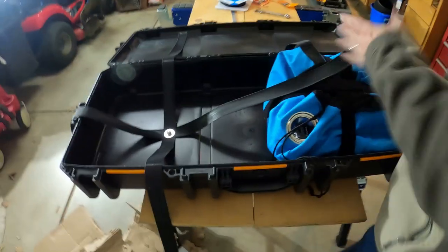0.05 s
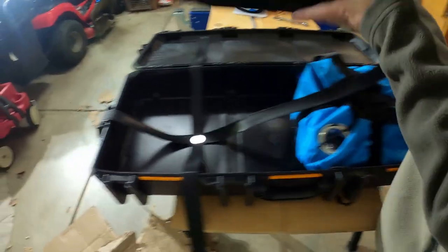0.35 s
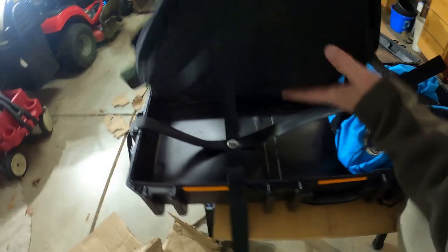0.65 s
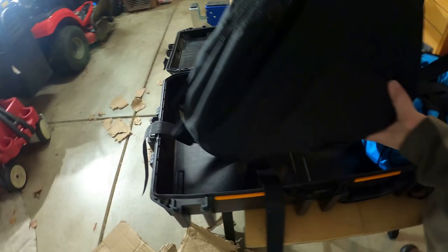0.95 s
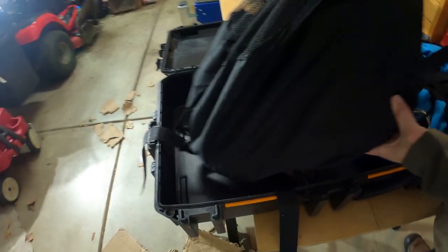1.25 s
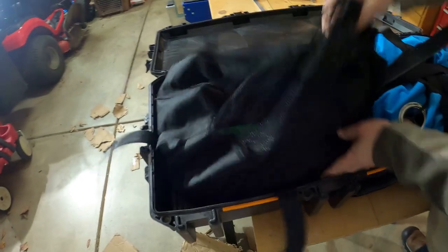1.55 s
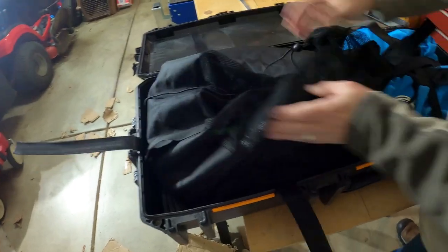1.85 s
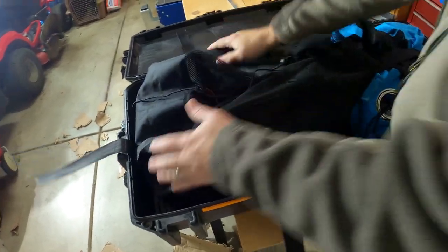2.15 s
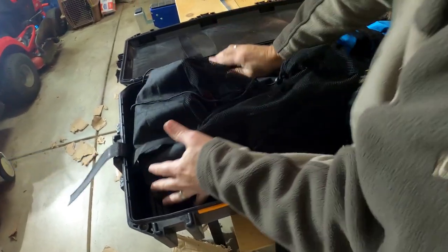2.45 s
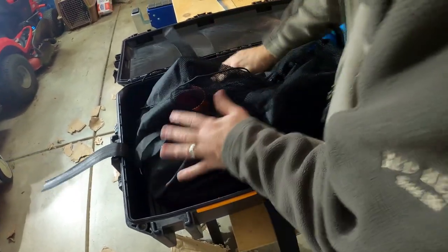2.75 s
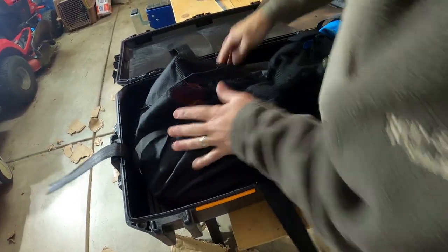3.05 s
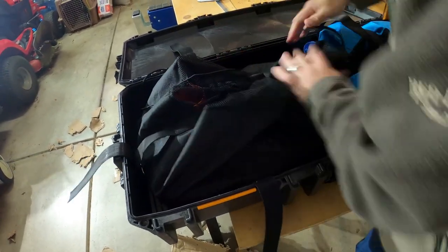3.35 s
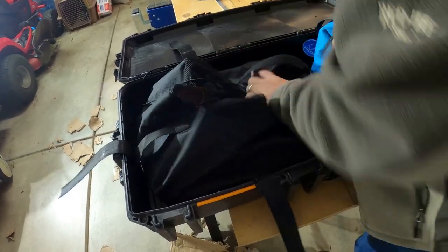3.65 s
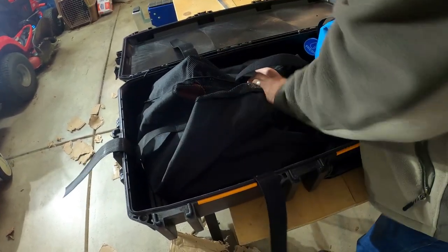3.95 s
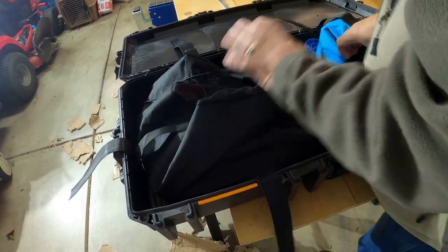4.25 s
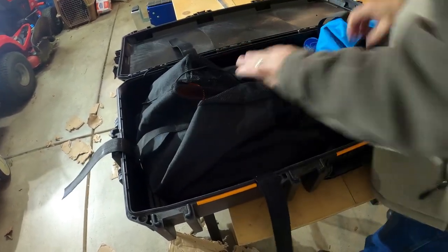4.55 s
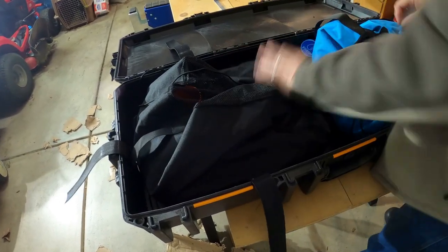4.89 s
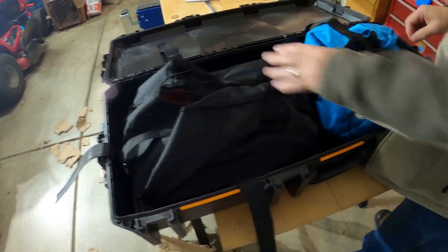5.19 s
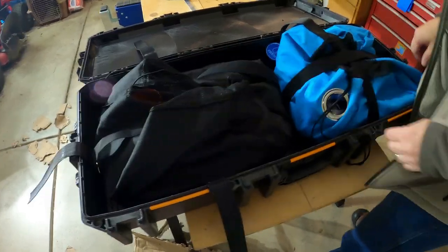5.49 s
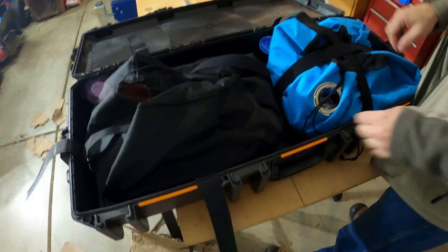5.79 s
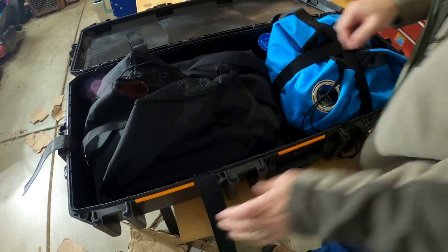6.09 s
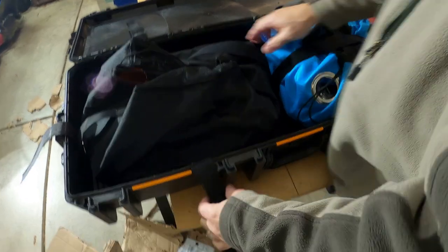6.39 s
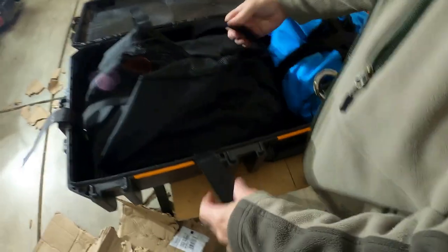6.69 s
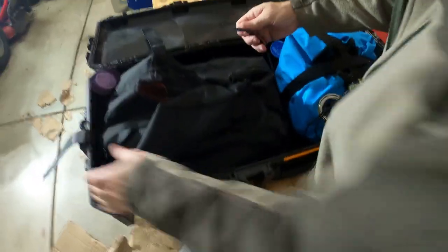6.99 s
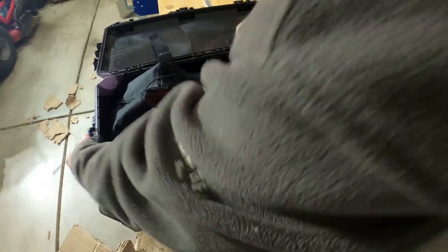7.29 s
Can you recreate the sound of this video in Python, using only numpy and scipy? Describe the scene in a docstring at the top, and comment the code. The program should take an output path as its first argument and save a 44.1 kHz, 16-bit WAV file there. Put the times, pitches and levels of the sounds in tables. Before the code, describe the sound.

Close swishing of nylon being packed into a plastic case, with padded hollow thuds and small buckle clicks in a garage.

```python
"""Packing nylon bags into a plastic case

Soft bags are lifted, dropped and patted down into a hard case, close by in a garage.
Cloth slides, crinkles and judders on the plastic, buckles tap it, and the padded blows
boom in the shell. At the end a strap is pulled up over the rim."""
import sys
import numpy as np
from scipy import signal
from scipy.fft import rfft, irfft, next_fast_len
from scipy.io import wavfile
from scipy.ndimage import uniform_filter1d, map_coordinates

SR = 44100
rng = np.random.default_rng(int(sys.argv[2]) if len(sys.argv) > 2 else 0)


def store_wav(level_fs):
    """Save 16-bit WAV to argv[1]."""
    pcm = np.round(np.clip(np.atleast_2d(level_fs), -1, 1) * 32767)
    wavfile.write(sys.argv[1], SR, pcm.T.astype(np.int16))


N = 323253


def amp(db):
    """Decibels to gain."""
    return 10 ** (np.asarray(db) / 20)


def unit(x):
    """Scale to rms 1."""
    return x / np.sqrt(np.mean(x ** 2) + 1e-20)


def along(points, hz):
    """Interpolate (Hz, value) points on a log frequency axis."""
    knots_hz, values = np.transpose(points)
    return np.interp(np.log(hz + 1), np.log(knots_hz + 1), values)


def fade(t, t60):
    """Exponential decay by 60 dB in t60."""
    return np.exp(-np.log(1000) * t / t60)


def wobble(rate_hz):
    """Smooth random curve, rate_hz knots a second."""
    knots = rng.standard_normal(int(N * rate_hz / SR) + 4)
    return map_coordinates(knots, [np.arange(N) * rate_hz / SR])


def filtered(x, response):
    """Apply a gain given as a function of frequency."""
    size = next_fast_len(x.shape[-1] + SR // 2)
    return irfft(rfft(x, size) * response(np.fft.rfftfreq(size, 1 / SR)), size)[..., :x.shape[-1]]


def coloured(x, spectrum):
    """Shape x by (Hz, dB) points, at rms 1."""
    return unit(filtered(x, lambda hz: amp(along(spectrum, hz))))


def band(x, low_hz, high_hz, order):
    """Causal band-pass."""
    sos = signal.butter(order, [low_hz, min(high_hz, 0.45 * SR)], 'band', fs=SR, output='sos')
    return signal.sosfilt(sos, x)


def add(track, start_s, sound):
    """Mix a sound into a track."""
    start = max(round(start_s * SR), 0)
    track[start:start + len(sound)] += sound[:N - start]


# Garage reverberation. Each row: frequency in Hz, t60 in seconds.
GARAGE_DECAY = [(100, 0.25), (300, 0.63), (1000, 0.33), (4000, 0.44), (12000, .22)]


def garage(x, wet_db):
    """Add the room's tail, drawn anew each call as it differs from place to place."""
    hz, t, noise = signal.stft(rng.standard_normal(SR // 2), SR, nperseg=256)
    envelope = fade(t, along(GARAGE_DECAY, hz)[:, None]) * (1 - np.exp(-t / 0.0051))
    tail = signal.istft(noise * envelope, SR, nperseg=256)[1]
    return x + amp(wet_db) * signal.fftconvolve(x, tail / np.linalg.norm(tail))[:len(x)]


# Panel modes of the open case. Each row: frequency in Hz, level in dB, t60 in seconds.
SHELL_MODES = [(123.4, 2.5, 0.23), (143.3, 2.5, 0.38), (170, -22, 0.29), (230, 5.5, 0.2), (255, -10, .25),
               (325, -5, 0.71), (378, 6, 0.14), (480, -28, .25), (500, -1, 0.19), (517, 4, 0.28),
               (570, 1, 0.21), (646, -10, 0.14), (950, -2, .2)]


def shell(x, ring_db):
    """Add the ringing of the case panels that x drives."""
    t = np.arange(SR // 2) / SR
    ring = sum(amp(db) * np.cos(2 * np.pi * hz * t) * fade(t, t60_s) for hz, db, t60_s in SHELL_MODES)
    return x + amp(ring_db) * signal.fftconvolve(x, ring / np.abs(rfft(ring)).max())[:len(x)]


# Background noise. Each row: frequency in Hz, density in dB.
AIR_SPECTRUM = [(15, -62), (25, -32), (95, -31), (158, 7.5), (925, -15), (1150, 1.5), (1240, -3),
                (1900, -5), (2420, -26), (6340, -16.5), (8290, -30), (10500, -35), (14900, -67)]


def air():
    """Faint, steady room noise."""
    return amp(-56) * coloured(rng.standard_normal(N), AIR_SPECTRUM)


def friction(spectrum, rate_hz, spread_db, grain_db):
    """Sliding weave: a smooth rush plus tiny slips of uneven size."""
    slips = (rng.random(N) < rate_hz / SR) * rng.choice([-1, 1], N)
    sizes = amp(spread_db * np.clip(rng.standard_normal(N), -2, 2))
    return coloured(rng.standard_normal(N) + amp(grain_db) * unit(slips * sizes), spectrum)


def folds(x, depth_db=1.9):
    """Folds open and close, shifting the colour of the rub."""
    frames = signal.stft(x, nperseg=512)[2]
    drift = uniform_filter1d(rng.standard_normal(frames.shape), size=16, axis=0)
    drift = uniform_filter1d(drift, size=6, axis=1)
    return signal.istft(frames * amp(depth_db * unit(drift)), nperseg=512)[1][:N]


def crinkles(rate_hz, centre_hz, spread_db):
    """Creases pop at random, each a few cycles at its own pitch."""
    out, t = np.zeros(N), np.arange(SR // 80) / SR
    for when, pitch, size in rng.random((int(rate_hz * N / SR), 3)):
        hz = centre_hz * 2 ** (3 * pitch - 1.5)
        pop = np.sin(2 * np.pi * hz * t) * fade(t * hz, 8)
        add(out, when * N / SR, amp(spread_db * size ** 2) * pop)
    return unit(out)


# Hands lift, press, tuck and pull. Each row: start in seconds, length in seconds, effort in dB,
# slick nylon and shell drag in dB over the effort.
HAND_MOVES = [(0.0, 1, -43, -15, -4.5), (0.502, 0.039, -38.5, 5, -4.5), (0.575, 0.24, -43, -0.5, -3),
              (0.878, .06, -40.5, -3.5, -6), (1.003, .12, -44.5, -8.5, -5.5),
              (1.185, 0.059, -41.5, -13.5, -7), (1.33, 0.46, -40.5, -7.5, -11),
              (1.632, 0.094, -32.5, -16.5, 6.5), (2.19, 0.59, -40, -8, -1.5), (2.556, 0.2, -32.5, -15, 1.5),
              (2.853, 0.11, -40, -13.5, 5), (3.054, 0.056, -36.5, -15, -2.5), (3.448, 0.15, -39, -9.5, 1.5),
              (3.66, 0.12, -35, -17, 2), (3.822, 0.16, -42.5, -13.5, 9), (4.062, 0.2, -39.5, -15, -2.5),
              (4.32, 0.29, -48, -10.5, 5), (4.515, 0.1, -34, -20, 5), (4.723, 0.18, -46, -16.5, 0),
              (5.026, 0.1, -41.5, -7, -7), (5.2, 0.13, -50.5, -15.5, 2.5), (5.626, 0.41, -55.5, -9.5, -1),
              (6.142, 0.24, -45, -15, -9), (6.667, 0.066, -38.5, -6, -3), (6.785, 0.47, -48, -5.5, 0.5)]
# Sleeves never quite rest. One row: rub, scrape, hiss and drag floors in dB.
SLEEVE_FLOOR_DB = [-54, -60, -68, -60]


def efforts_db(attack_s=0.086, release_s=0.11, arch_db=2):
    """Rub, scrape, hiss and drag levels: each move swells, is fastest midway and dies away."""
    t = np.arange(N) / SR
    power = np.outer(amp(SLEEVE_FLOOR_DB) ** 2, np.ones(N))
    for start_s, length_s, db, slick_db, drag_db in HAND_MOVES:
        before = np.maximum((start_s - t) / attack_s, 0)
        after = np.maximum((t - start_s - length_s) / release_s, 0)
        drop_db = 20 * (before + after)
        arch = (2 * np.clip((t - start_s) / length_s, 0, 1) - 1) ** 2
        near = drop_db < 80
        envelope = amp(db - drop_db[near] - arch_db * arch[near])
        scrape_db = 0.37 * slick_db - 2
        power[:, near] += np.outer(amp([0, scrape_db, slick_db, drag_db]), envelope) ** 2
    return 10 * np.log10(power)


# Cloth rub, coarse weave, slick nylon, drag on the shell. Each row: frequency in Hz, density in dB.
RUB_SPECTRUM = [(100, -20), (300, -4.5), (600, 4.5), (1000, 1), (1900, -1.5), (2600, -6), (4500, -30),
                (8000, -62)]
SCRAPE_SPECTRUM = [(600, -41), (1500, -1.5), (2300, 2), (3300, -1), (4600, -3.5), (5500, -14.5),
                   (8000, -27.5), (14000, -46)]
HISS_SPECTRUM = [(500, -44.5), (2000, 4), (4400, 4), (6500, 2.5), (8800, -2.5), (10000, 0.5), (11700, -5),
                 (13000, -7), (15000, -46)]
DRAG_SPECTRUM = [(25, -42), (80, -46), (125, -7.5), (220, 2.5), (380, 4), (520, -1), (750, -27),
                 (1300, -14.5), (4000, -72)]


def handling():
    """Bags and sleeves slide and crinkle; under load the drag drums on the shell."""
    rub_db, scrape_db, hiss_db, drag_db = efforts_db()
    # A light stroke glides, a firm one catches and lets go.
    grip_db = wobble(38) * np.interp(rub_db, [-50, -42], [0.7, 1.9])
    rub = amp(rub_db - 1.5) * folds(friction(RUB_SPECTRUM, rate_hz=540, spread_db=9, grain_db=-10.5))
    weave = folds(friction(SCRAPE_SPECTRUM, rate_hz=600, spread_db=3.5, grain_db=-2))
    scrape = amp(scrape_db - 0.04 + 0.55 * wobble(24)) * weave
    creases = amp(scrape_db - 9) * crinkles(rate_hz=130, centre_hz=2800, spread_db=18)
    hiss_gain = amp(hiss_db - 0.5 + 1.05 * wobble(42))
    hiss = hiss_gain * folds(friction(HISS_SPECTRUM, rate_hz=890, spread_db=7.5, grain_db=-5))
    drag = unit(shell(friction(DRAG_SPECTRUM, rate_hz=90, spread_db=7, grain_db=0), ring_db=1))
    cloth = garage(amp(grip_db) * (rub + scrape + creases + hiss), wet_db=-16.5)
    return cloth + amp(drag_db - 0.2 + 2.46 * wobble(30)) * drag


# Fast cloth strokes. Each row: peak time in seconds, level in dB, 20 dB rise and fall in seconds,
# brightness in Hz.
CLOTH_STROKES = [(0.296, -38.5, 0.058, 0.046, 1800), (.472, -33.5, 0.016, 0.11, 12000),
                 (1.49, -34, 0.13, 0.087, 3000), (2.0, -45.5, 0.045, 0.16, 2000),
                 (2.732, -34, 0.012, .08, 2570), (3.124, -36.5, 0.073, .015, 1700),
                 (3.224, -37, 0.017, 0.098, 6700), (4.115, -40.5, 0.18, 0.017, 2160),
                 (4.466, -33.5, .07, 0.023, 5000), (6.738, -32, 0.1, 0.1, 2750),
                 (7.015, -40.5, 0.014, 0.076, 9000)]
# Their colour. Each row: frequency in Hz, density in dB.
STROKE_SPECTRUM = [(60, -15), (200, -1), (500, -2.5), (1000, -2), (2000, -3.5), (4000, -2.5), (5500, -6),
                   (8500, -10.5), (11000, -9), (15000, -28)]


def swishes():
    """A stroke, free or part of a blow, swells until the cloth stops; faster ones are brighter."""
    out, t = np.zeros(N), np.arange(N) / SR
    weave = folds(friction(STROKE_SPECTRUM, rate_hz=1500, spread_db=5, grain_db=-1))
    free_strokes = [(0, *row) for row in CLOTH_STROKES]
    for start_s, peak_s, db, rise_s, fall_s, bright_hz in [*free_strokes, *blow_strokes()]:
        stroke = unit(band(weave, 77, bright_hz, order=1)) * (t >= start_s)
        drop_db = 20 * np.maximum((peak_s - t) / rise_s, (t - peak_s) / fall_s)
        out += amp(db - drop_db) * stroke
    return garage(out, wet_db=-12)


# The bag judders on the shell. Each row: start in seconds, level in dB, pitch in Hz,
# length in seconds, roughness from 0 to 1.
BAG_JUDDERS = [(2.564, -13, 482, 0.026, 0.38), (3.743, -25.5, 516, 0.036, 0.42),
               (4.13, -24, 522, 0.035, 0.29), (4.768, -37, 536.5, 0.14, 0.99),
               (5.245, -41, 560, 0.11, 0.84), (6.588, -32, 410, 0.018, 0.43), (6.665, -32, 600, 0.043, 0.6),
               (6.705, -28, 670, 0.016, 0.67)]


def judders():
    """Nylon sticks and slips on plastic: even slips hoot, uneven ones rub hoarsely."""
    out, t = np.zeros(N), np.arange(SR // 4) / SR
    for start_s, db, hz, length_s, rough in BAG_JUDDERS:
        slip_hz = hz * (1 - 0.14 * np.exp(-t / 0.005) + 0.25 * rough * wobble(350)[:len(t)])
        hoot = np.sin(2 * np.pi * np.cumsum(slip_hz) / SR)
        envelope = np.exp(-(t / length_s) ** 2) * (1 - np.exp(-t / 0.0014))
        flutter_db = 2.6 * rough * wobble(117)[:len(t)]
        add(out, start_s, amp(db + flutter_db) * envelope * hoot)
    return garage(out, wet_db=-11)


# Buckles and strap ends hit plastic. Each row: start in seconds, level in dB, brightness in Hz,
# decay scale in seconds.
BUCKLE_TAPS = [(.0428, -13, 3450, 0.036), (.3006, -16.5, 2630, 0.059), (.3746, -21.5, 2230, 0.058),
               (.406, -23, 2430, .039), (.4376, -14, 3540, 0.056), (.4444, -17.5, 1970, 0.054),
               (.5194, -17.5, 1090, 0.3), (.54, -30.5, 6140, 0.035), (.625, -22.5, 2000, 0.038),
               (.8592, -12, 2020, 0.047), (.861, -17, 940, .04), (1.234, -30, 1780, .057),
               (1.9912, -34, 1800, 0.048), (2.2727, -25.5, 4230, 0.021), (2.6262, -13.5, 4330, 0.012),
               (2.8853, -15.5, 3600, .014), (2.8925, -11.5, 1090, .026), (3.138, -18.5, 980, 0.022),
               (3.5795, -19.5, 1300, .025), (3.6146, -17.5, 1310, 0.022), (3.6594, -16, 1250, 0.036),
               (4.285, -33, 8060, .022), (4.592, -20.5, 1490, 0.13), (4.904, -35.5, 6960, 0.014),
               (5.006, -12, 3540, .03), (5.109, -28.5, 1820, 0.049), (5.1502, -22.5, 2380, 0.015),
               (6.594, -26.5, 1940, 0.12), (6.636, -27, 4570, 0.02)]
# Rim and buckle modes. Each row: frequency in Hz, level in dB, t60 in seconds.
PLASTIC_MODES = [(890, -6, .09), (1157, -6, .08), (1588, -1, .09), (1640, -1, .08), (1797, -2, .09),
                 (2030, 2, .09), (2355, -4, .07), (2770, -2, .05), (3500, -4, .04), (3625, -4, .04),
                 (4416, -6, .03)]
# A hard contact. Each row: frequency in Hz, density in dB.
CRACK_SPECTRUM = [(300, 14), (4500, 2), (5600, -3.5), (14000, -16)]


def taps():
    """Buckles and blows crack on the plastic and ring it; harder contacts reach higher modes."""
    out, t = np.zeros(N), np.arange(SR // 2) / SR
    for start_s, db, bright_hz, decay_s in [*BUCKLE_TAPS, *blow_contacts()]:
        ring = np.zeros(len(t))
        for hz, mode_db, t60_s in PLASTIC_MODES:
            gain = amp(mode_db + rng.normal(0, 0.25))
            ring += gain * np.sin(2 * np.pi * (hz * t + rng.random())) * fade(t, t60_s)
        ring *= amp(-14.5) * fade(t, 2 * decay_s)
        crack = coloured(rng.standard_normal(len(t)), CRACK_SPECTRUM) * fade(t, 0.82 * decay_s)
        tap = band(crack + ring, 0.42 * bright_hz, 1.66 * bright_hz, order=3)
        crest = uniform_filter1d(np.abs(signal.hilbert(tap)), size=40).max()
        add(out, start_s, amp(db - 2.5) * garage(tap / crest, wet_db=-9.5))
    return out


# Light bumps on the shell. Each row: start in seconds, level in dB, pitch in Hz,
# first rebound in dB over that level.
LIGHT_BUMPS = [(.088, -23.5, 274, -11), (.157, -28.5, 240, -6), (0.705, -24.5, 398, -23),
               (.802, -26, 515, -22), (.861, -22.5, 424, -12), (2.214, -25, 280, 1), (2.446, -28, 300, -10),
               (2.819, -25.5, 375, -11), (2.891, -13.5, 471, -8.5), (3.141, -13.5, 293, -26),
               (3.658, -22, 420, -4), (3.931, -20.5, 445, -29), (5.801, -29, 240, -2),
               (6.592, -22.5, 490, -16), (7.125, -31, 251, -13)]


def bump_pushes(spacing_s=0.03, loss_db=5.5, rebound_ratio=0.84):
    """A bump rebounds three times at a lower pitch. Yields (s, dB, Hz)."""
    for start_s, db, hz, rebound_db in LIGHT_BUMPS:
        yield start_s, db, hz
        for k in range(3):
            delay_s = spacing_s * (k + 1 + 0.15 * rng.normal())
            yield start_s + delay_s, db + rebound_db - loss_db * k, hz * rebound_ratio


def jostles(count, scatter_octaves=0.68):
    """Loose contents knock at uneven steps, as (share of the time span, pitch ratio)."""
    when, pitch = rng.random((count, 2)).T
    return zip((np.arange(count) + when) / count, 2 ** (scatter_octaves * (2 * pitch - 1)))


# The bag is dropped, shoved or slapped. Each row: first touch in seconds, sinking time in seconds,
# level in dB, pitch in Hz, swish in dB, brightness in Hz, slap in dB, 20 dB settling time in seconds.
BAG_BLOWS = [(1.506, 0.085, -3, 255, -16.5, 1290, -25, 0.2261),
             (2.495, .108, -3.5, 240, -27, 970, -51, 0.22),
             (4.4675, .017, -7.5, 233, -23.5, 1800, -12, 0.1),
             (4.9692, .031, -8, 229, -21, 1980, -16.5, 0.01)]
# The push deepens as padding packs down. Each row: seconds from bottoming out, gain in dB, pitch ratio.
PADDING_PUSHES = [(-.005, -2, 2), (0, -1.5, 0.87), (.005, -4.5, .58)]


def blow_pushes(sink_ratio=1.56, settle_ratio=0.95, growth_db=14):
    """The bag touches, jostles as it sinks, packs down and settles. Yields (s, dB, Hz)."""
    for touch_s, sink_s, db, hz, _, _, slap_db, settle_s in BAG_BLOWS:
        bottom_s = touch_s + sink_s
        yield touch_s, slap_db + 0.5, hz * sink_ratio
        for share, ratio in jostles(4):
            yield touch_s + share * sink_s, db - 3 - growth_db * (1 - share), hz * sink_ratio * ratio
        for delay_s, push_db, ratio in PADDING_PUSHES:
            yield bottom_s + delay_s, db + push_db, hz * ratio
        for share, ratio in jostles(12):
            yield bottom_s + share * settle_s, db - 6.5 - 20 * share, hz * settle_ratio * ratio


def blow_strokes(swish_fall_s=0.026, crumple_db=-12.5):
    """Cloth swishes as the bag sinks, then crumples as it settles."""
    for touch_s, sink_s, _, _, db, bright_hz, _, settle_s in BAG_BLOWS:
        yield touch_s, touch_s + 0.79 * sink_s, db, 1.42 * sink_s, swish_fall_s, bright_hz
        yield touch_s, touch_s + sink_s, db + crumple_db, sink_s, settle_s, bright_hz


def blow_contacts(slap_hz=2160, decay_s=0.04, rap_db=7):
    """A blow slaps at first touch and raps the shell as it bottoms out."""
    for touch_s, sink_s, _, _, swish_db, bright_hz, slap_db, _ in BAG_BLOWS:
        yield touch_s, slap_db, slap_hz, decay_s
        yield touch_s + sink_s, swish_db + rap_db, bright_hz, decay_s


def thumps(rise_cycles=0.64, t60_cycles=4.18):
    """Each padded push heaves the shell for a cycle or two, crushes cloth and rings the panels."""
    out, t = np.zeros(N), np.arange(SR // 2) / SR
    for start_s, db, hz in [*blow_pushes(), *bump_pushes()]:
        cycles = hz * t
        heave = np.sin(2 * np.pi * cycles) * fade(cycles, t60_cycles)
        heave *= 1 - np.exp(-cycles / rise_cycles)
        crush = unit(band(rng.standard_normal(len(t)), 276, 853, order=3)) * fade(t, 0.073)
        thump = heave / np.abs(heave).max() + amp(-10) * crush
        add(out, start_s, amp(db - 2) * garage(thump, wet_db=-8))
    # The case is too small to radiate deep bass.
    return band(shell(out, ring_db=0.5), 98.5, 4130, order=6) + amp(-19.5) * out


# Stereo width. Each row: frequency in Hz, side over mid in dB.
STEREO_WIDTH = [(30, -26), (150, -74), (700, -72), (1400, -58), (2800, -51.5), (5600, -28.5), (9500, -26),
                (11000, -16), (12500, -1), (15000, 8)]


def stereo(mono):
    """Everything is central; only the top treble spreads between the channels."""
    def angle(hz):
        return np.arctan(amp(along(STEREO_WIDTH, hz)))

    scatter = rng.standard_normal(SR // 30)
    diffuse = signal.fftconvolve(mono, scatter / np.linalg.norm(scatter))[:N]
    mid = filtered(mono, lambda hz: np.cos(angle(hz)))
    side = filtered(diffuse, lambda hz: np.sin(angle(hz)))
    return np.array([mid + side, mid - side])


def scene():
    """Room noise, cloth and the knocks on the case, in stereo."""
    return stereo(air() + handling() + swishes() + thumps() + taps() + judders())


def record(dry, ceiling=0.9, top_hz=14950):
    """Round off the highest peaks and cut everything above the band limit."""
    rounded = dry / (1 + np.abs(dry / ceiling) ** 6) ** (1 / 6)
    return filtered(rounded, lambda hz: hz < top_hz)


dry = scene()
out = record(dry)
store_wav(out)
```